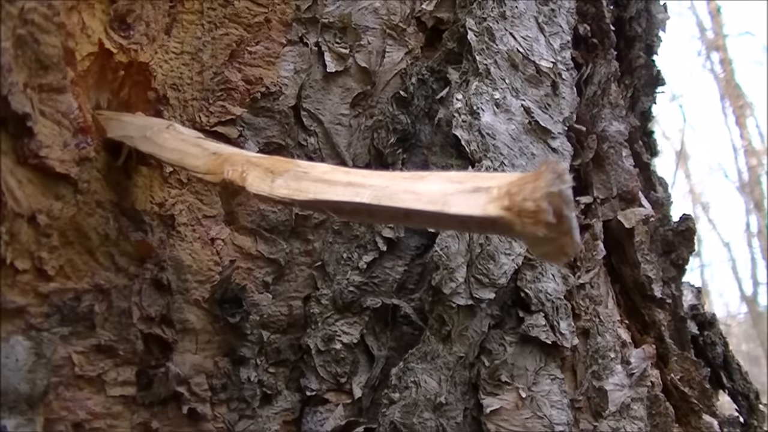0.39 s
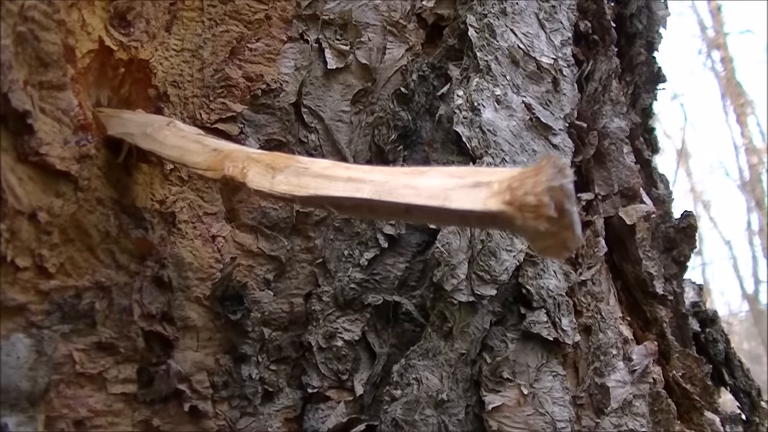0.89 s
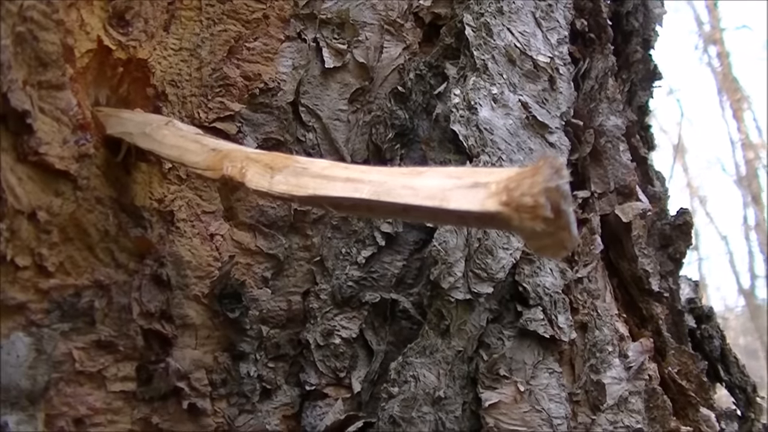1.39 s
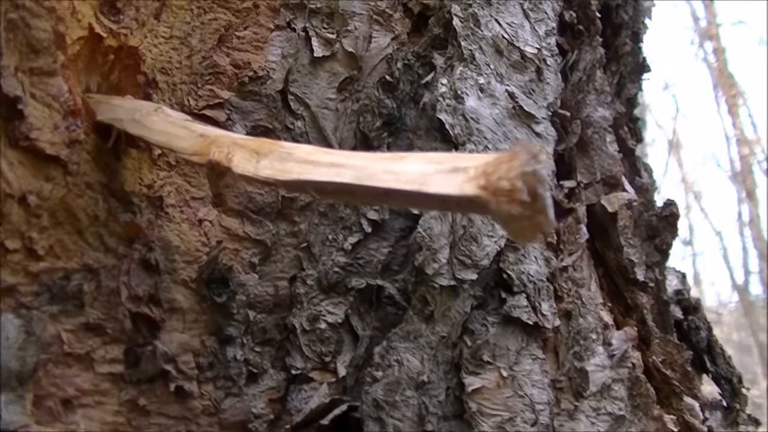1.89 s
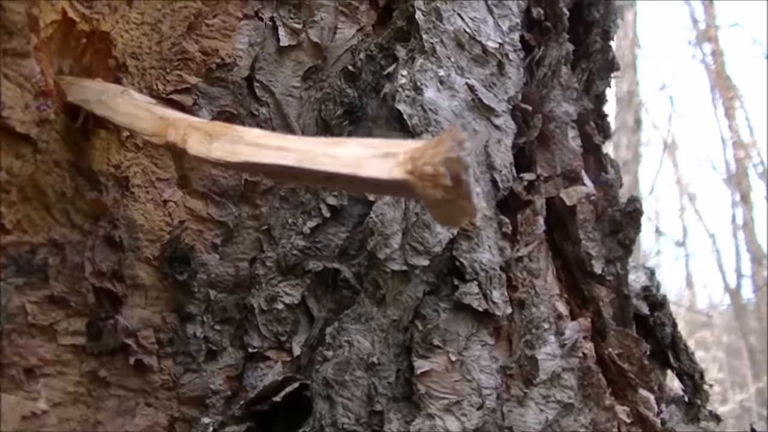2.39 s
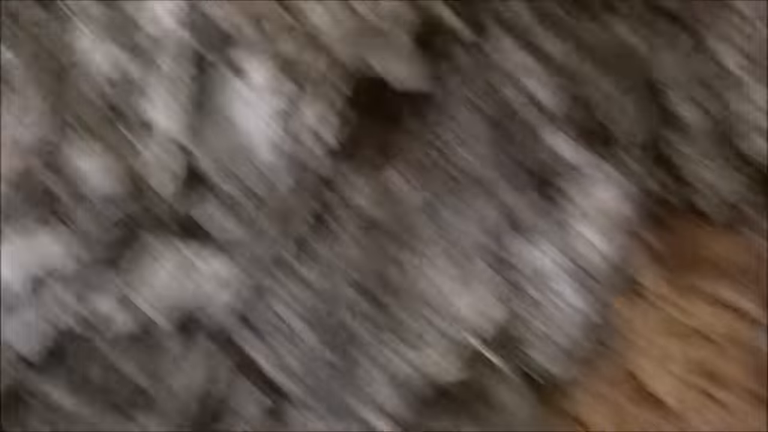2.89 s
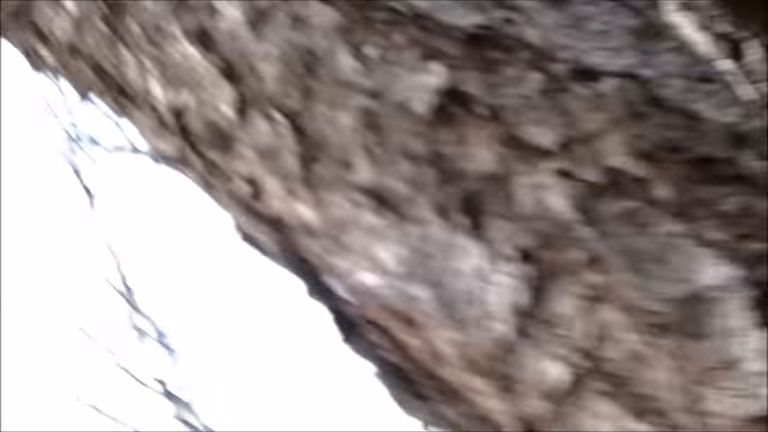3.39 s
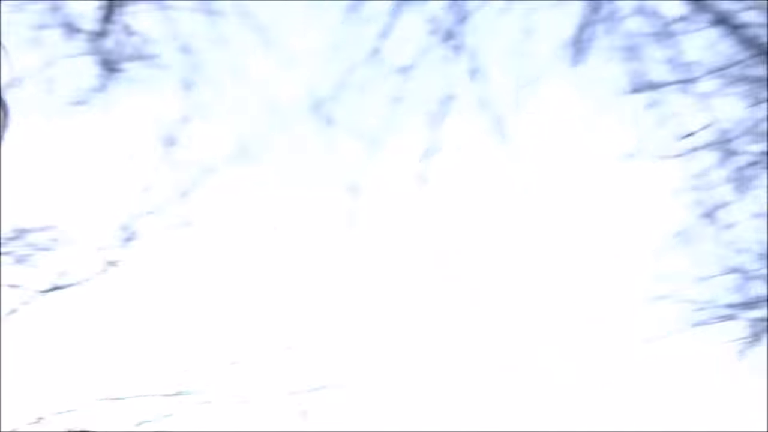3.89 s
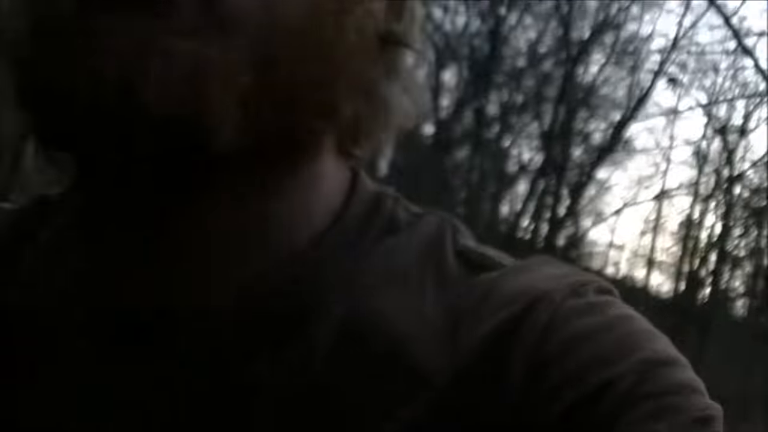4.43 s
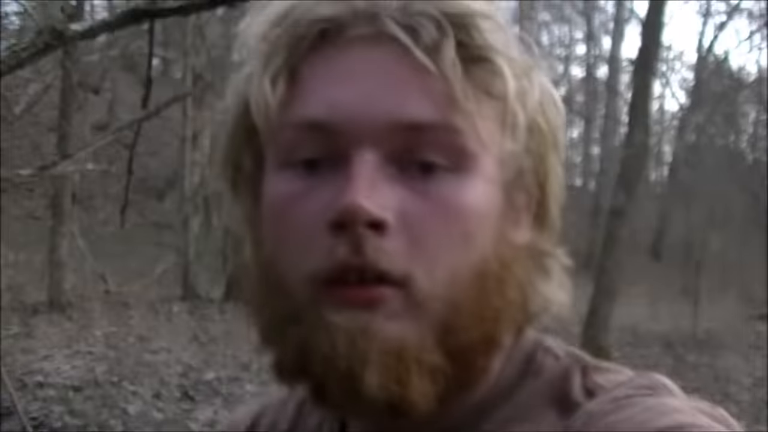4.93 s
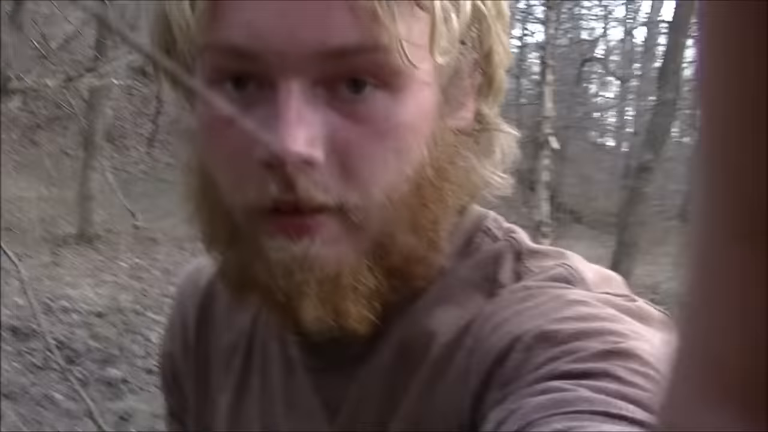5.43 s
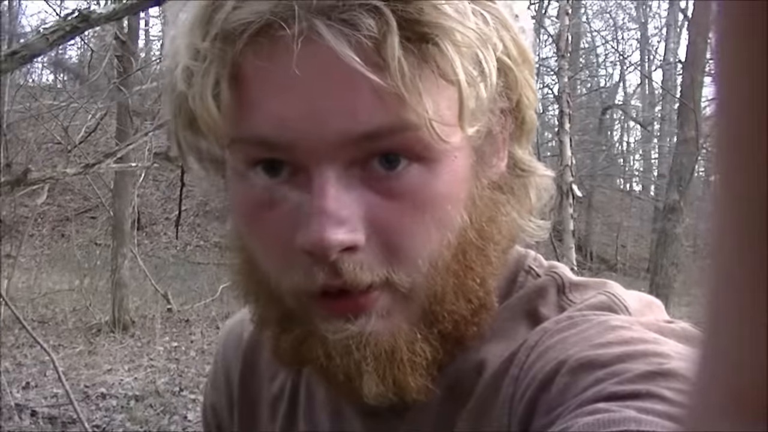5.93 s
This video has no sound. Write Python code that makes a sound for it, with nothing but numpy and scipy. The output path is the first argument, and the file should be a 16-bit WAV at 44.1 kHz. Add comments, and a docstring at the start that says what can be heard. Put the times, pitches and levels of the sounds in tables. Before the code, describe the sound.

A distant pond of tiny frogs peeps continuously in a high, shimmering chorus over faint rumble and hiss. Sparse dry leaf snaps come first. Then the handheld camera swings round: ticks and dull knocks on its body, rubbing, loud crackling leaves and soft puffs of air. The handling thins out, leaving the chorus stronger and slightly to the right, with a few nearer peeps.

```python
"""A pond of tiny tree frogs peeps across a bare spring wood over far rumble and hiss: gliding sines, shaped noise.
A few leaf snaps and one faint body knock come first: short noise bursts, each struck by a single impulse.
Then a hand-held camera is swung round. Feet crackle in dry leaves, a hand rubs and knocks the body,
ticks ring and air puffs on the ports: noise broken into clicks and clumps, bursts and low shaped noise.
The chorus swells and drifts right as the microphones turn toward the pond."""
import sys
import numpy as np
from scipy import signal
from scipy.fft import rfft, irfft, next_fast_len
from scipy.io import wavfile
from scipy.ndimage import map_coordinates

SR = 44100
rng = np.random.default_rng(int(sys.argv[2]) if len(sys.argv) > 2 else 0)


def log_audio(samples):
    """Write samples as a 16-bit WAV file to the path given in sys.argv[1]."""
    # one column per channel
    frames = np.atleast_2d(samples).T
    # limit to full scale, then quantise
    limited = np.clip(frames, -1, 1)
    pcm = np.round(limited * 32767).astype(np.int16)
    wavfile.write(sys.argv[1], SR, pcm)


def volts(x):
    """Linear amplitude factor 10**(x/20) for a level x in dB, scalar or array-like."""
    e = np.asarray(x, float) / 20
    return 10 ** e


N = 266754  # length in samples


def unit(x):
    """Scale to rms 1."""
    return x / np.sqrt(np.mean(x ** 2) + 1e-20)


def along(points, hz):
    """Read (Hz, value) points on a log frequency axis."""
    f, v = np.transpose(points)
    return np.interp(np.log(hz + 1), np.log(f + 1), v)


def curves(rows, before):
    """One value per sample for each column after the time; `before` holds until the first row."""
    s, *columns = np.transpose(rows)
    return [np.interp(np.arange(N) / SR, s, column, left=before) for column in columns]


def wobble(rate):
    """A smooth random curve, rate knots a second."""
    knots = rng.standard_normal(int(N * rate / SR) + 4)
    return map_coordinates(knots, [np.arange(N) * rate / SR])


def noise_pair():
    """Two unrelated white noises."""
    return rng.standard_normal((2, N))


def filtered(x, response):
    """x times a response of frequency, real or complex."""
    m = next_fast_len(x.shape[-1] + 4096)
    spectrum = rfft(x, m) * response(np.fft.rfftfreq(m, 1 / SR))
    return irfft(spectrum, m)[..., :x.shape[-1]]


def spread(pair, spectrum, alike):
    """Two unrelated noises coloured and mixed to a left-right likeness, rms 1."""
    def mid_side_response(hz):
        angle = np.arccos(np.clip(along(alike, hz), -1, 1)) / 2
        return volts(along(spectrum, hz)) * [np.cos(angle), np.sin(angle)]

    mid, side = filtered(pair, mid_side_response)
    return unit(np.array([mid + side, mid - side]))


def sides(db):
    """Left and right gains for a left-right difference in dB, positive to the left."""
    return volts(np.array([db, -np.asarray(db)]) / 2)


def add(track, s, sound):
    """Mix a stereo sound in at time s."""
    part = track[:, max(round(s * SR), 0):][:, :sound.shape[1]]
    part += sound[:, :part.shape[1]]


# partials of a peep: multiple of the sung note, level/dB
PEEP_PARTIALS = [(.5, -36), (1, -3), (1.5, -41)]


def peep(hz, length, rise, phase):
    """A whistled note gliding up by rise Hz/s, loudest a little before its middle."""
    u = np.arange(round(length * SR)) / (length * SR)
    turns = np.cumsum(hz + rise * length * (u - .5)) / SR
    shape = np.sin(np.pi * u ** 0.77) ** 0.79
    partials = [volts(db) * np.sin(2 * np.pi * k * (turns + phase)) for k, db in PEEP_PARTIALS]
    return np.sqrt(2) * shape * sum(partials)


def trunks(x, t60):
    """Scattering among the trees: a short noisy tail, partly different at each ear."""
    t = np.arange(SR // 2) / SR
    shared, left, right = rng.standard_normal((3, len(t))) * volts(-60 * t / t60)
    tail = np.array([shared + 0.9 * left, shared + 0.63 * right])
    return signal.fftconvolve(x, tail / np.linalg.norm(tail[0]), axes=1)[:, :x.shape[1]]


# the far chorus as the microphones turn: t/s, level/dB, left-right difference/dB
CHORUS_TURN = [(0, -41, -.5), (1.4, -40, -0.5), (1.92, -41.5, -1), (2.6, -40, -.5), (2.9, -38, -0.5),
               (3.07, -36, 1), (3.5, -38.5, -1), (4.25, -36.5, -4), (4.78, -35, -3), (5.2, -35, -2.5),
               (5.7, -35, -2.5), (6.05, -34, -2)]
# a broad, toneless murmur from the pond, either side of the peeps: f/Hz, relative level/dB
POND_MURMUR = [(900, -10.5), (1300, -3), (1500, 2.5), (1900, -4.5), (2300, -5.5), (3500, -6.5),
               (3900, -12.5), (4300, -3.5), (4700, -9), (5300, -21.5)]
# stereo image of the murmur and of everything near: f/Hz, left-right likeness (-1 to 1)
NEAR_LIKENESS = [(60, 0.39), (130, 0.81), (290, 0.81), (640, 0.94), (3100, 0.83), (6800, 0.35),
                 (15000, -0.21)]


def far_chorus(groups=10, count=36):
    """Frogs keep their own pitch, place and pace, about a peep a second; each bank of the pond has its own echoes."""
    level_db, pan_db = curves(CHORUS_TURN, None)
    far = np.zeros((2, N + SR))  # one second of run-in
    for bank in rng.standard_normal((groups, count, 5)):
        calls = np.zeros((2, N + SR))
        for pitch, size, place, pace, glide in bank:
            gaps = .95 + .12 * pace + .06 * rng.standard_normal(9)
            times = rng.random() + np.cumsum(gaps) - 1
            note = peep(2900 + 150 * pitch, .11 + 0.01242 * glide, 2300 + 400 * pace, rng.random())
            # frogs far from the common pitch are the weaker ones
            call = volts(2 * size - 1.2 * pitch ** 2) * sides([3 * place]) * note
            for s in times[times < N / SR + 1]:
                add(calls, s, call)
        far += calls + volts(0.4) * trunks(calls, t60=1.0)
    far = unit(far[:, SR:]) * (1 + 0.19 * wobble(700))  # moving air makes far calls flutter
    far = far + volts(-21) * spread(noise_pair(), POND_MURMUR, NEAR_LIKENESS)
    return volts(level_db) * sides(pan_db) * far


# far rumble and hiss: f/Hz, relative level/dB
AIR_SPECTRUM = [(15, -57), (25, -25.5), (100, -13), (160, -12.5), (330, -18), (700, -24), (1300, -28),
                (2100, -32), (3700, -34), (5400, -37.5), (11000, -44), (16000, -56)]
# their stereo image: f/Hz, left-right likeness (-1 to 1)
AIR_LIKENESS = [(60, 0.49), (130, 0.59), (290, -0.031), (640, -0.59), (1400, -0.74), (6800, 0.0065),
                (15000, 0.41)]


def air():
    """Far rumble and the hiss of the wood and microphones: shaped noise, its level wavering slightly."""
    level_db = -53.5 + 0.51 * wobble(3.3)
    return volts(level_db) * spread(noise_pair(), AIR_SPECTRUM, AIR_LIKENESS)


def bursts(table, width, unlike, blow, lead_db, tail_db, lag_s, colour):
    """Each event creaks briefly, gives one blow and a noise burst round its centre pitch, then a weaker after-crackle."""
    lead = SR // 50  # samples of creak before the blow
    track, t = np.zeros((2, N)), np.arange(-lead, SR // 16) / SR
    for s, db, hz, t60_ms, pan in table:
        shared, left, right = rng.standard_normal((3, len(t)))
        main_fade = volts(-60 * t / (t60_ms / 1000))
        after_crackle = volts(tail_db - 60 * t / (t60_ms / 250))  # four times as long
        creak = volts(lead_db + 60 * t / 0.026)
        fade = np.where(t < 0, creak, main_fade + after_crackle)
        burst = fade * (shared + unlike * np.array([left, right]))
        burst[:, lead] -= blow
        # off-centre events reach one port first
        lag = lag_s * rng.standard_normal() * np.array([[.5], [-.5]])

        def response(f):
            spread_hz = width * hz  # width is band width over centre pitch
            band = (1j * f * spread_hz / (hz * hz - f * f + 1j * f * spread_hz)) ** 2
            return band * colour(f) * np.exp(-2j * np.pi * f * lag)

        sound = filtered(burst, response)
        peak = np.abs(sound).max(1).mean()
        add(track, s - lead / SR, volts(db) * sides([pan]) * sound / peak)
    return track


def snap_bursts(rows):
    """Leaves and twigs snap as wide, bright bursts; thin leaves give no bass."""
    leaf = lambda f: 1 / (1 + 1j * f / 10000) / (1 - 1j * 2600 / (f + 1))
    return bursts(rows, 2.7, unlike=.6, blow=1.5, lead_db=-20, tail_db=-18, lag_s=4e-5, colour=leaf)


# leaf and twig snaps: t/s, peak level/dB, centre f/Hz, t60/ms, left-right difference/dB
LEAF_SNAPS = [(.3042, -43, 7300, 7.8, 3), (.4511, -19, 7460, 4.4, 2), (.5318, -25, 8500, 5.5, 4),
              (.5434, -38, 9600, 6, -3), (.7942, -40.5, 6100, 12, -2), (1.5925, -34, 5600, 4.5, -3),
              (1.6675, -41, 4900, 6, 4), (1.7283, -37.5, 6300, 6.8, 1), (1.8928, -32.5, 6400, 6.1, 1),
              (1.9263, -26.5, 7540, 8, 2), (1.9613, -33, 5000, 8.2, 3), (2.3901, -31, 9500, 11, -1),
              (2.421, -38, 7600, 13, 2), (2.8431, -38, 7450, 17, -2), (2.9175, -35, 7900, 10, 3),
              (3.1135, -32, 7600, 7, -1), (3.2591, -26.5, 6700, 24, 0), (3.4056, -28, 6700, 50, 0),
              (3.4459, -20, 6100, 5, -2), (3.4649, -20, 7400, 24, -1), (3.4812, -4, 7340, 9.6, -.5),
              (3.5442, -21, 7000, 5.4, -2), (3.5714, -16, 6700, 11, -6), (3.5994, -14, 9900, 10, -5),
              (3.6312, -10.5, 6600, 6.4, 1), (3.6769, -1, 6600, 5, 1), (3.6926, -13.5, 6500, 7.4, -4),
              (3.798, -16, 8000, 19, 1), (3.8593, -15, 5700, 5.3, 3), (4.0281, -7.5, 6100, 19, 0),
              (4.0729, -5.5, 7560, 28, 0), (4.0909, -10, 8800, 42, -1), (4.4834, -15, 5500, 12, -1),
              (4.497, -11, 6850, 64, 0), (4.5378, -10, 5760, 17, -3), (4.5446, -8.5, 8100, 12, 2),
              (4.5522, -16, 8040, 4.3, 0), (4.6111, -16, 7000, 6, 0), (4.6198, -6.5, 5730, 10, -2),
              (4.6472, -17, 9200, 8.2, 11), (4.6899, -17.5, 5970, 26, -2), (4.7089, -16.5, 6500, 9, 0),
              (4.9613, -24, 10000, 8.9, -21), (4.9742, -22, 8900, 7.9, 15), (5.1533, -18, 6800, 6, -1),
              (5.2703, -26, 6060, 11.6, -3), (5.3449, -12, 7500, 24, -2), (5.362, -10, 6600, 5, -2),
              (5.4296, -19.5, 6800, 2.5, -3), (5.4593, -26.5, 8600, 5.1, -4), (5.5038, -9, 5100, 6.1, -5),
              (5.5122, -23.5, 7300, 3.7, -7), (5.5795, -29, 5140, 17, -6), (5.5946, -24.5, 5630, 4.2, -3),
              (5.8237, -21.5, 5900, 6.4, -1)]


def snaps():
    """The snaps that stand out: leaves and twigs breaking."""
    return snap_bursts(LEAF_SNAPS)


# camera body resonances: f/Hz, width/Hz, relative level/dB
BODY_MODES = [(166, 230, 12), (313, 55, -5), (460, 94, 1.5), (690, 1200, -52.5), (960, 110, -9.5),
              (1190, 27, -12.5), (1420, 1400, 0), (2220, 190, 7)]


def resonances(f):
    """Causal response of the camera body: a sum of damped modes."""
    return sum(volts(db) * 1j * f * w / (c * c - f * f + 1j * f * w) for c, w, db in BODY_MODES)


# knocks on the camera body: t/s, peak level/dB, centre f/Hz, t60/ms, left-right difference/dB
BODY_KNOCKS = [(.4504, -35, 1360, 11, 3), (2.7691, -33.5, 550, 21, -10), (2.9988, -19, 580, 25, -1.5),
               (3.1237, -29.5, 1100, 110, -7), (3.1674, -23.5, 1040, 37, -3), (3.28, -17.5, 520, 23, -3.5),
               (3.481, -12.5, 1560, 16, 0), (3.6766, -17, 1270, 20, -1), (3.8034, -17.5, 1160, 124, 0),
               (4.014, -11.5, 960, 31, -7), (4.028, -10.5, 930, 17, -2), (4.0673, -15, 680, 37, 0),
               (4.312, -28.5, 400, 17, -2), (4.4276, -17, 1500, 16, 0), (4.485, -25.5, 600, 20, -2),
               (4.5013, -19, 1160, 35, 0), (4.9124, -24, 1400, 4.4, -1), (4.949, -22.5, 1285, 6.9, -1),
               (4.985, -33.5, 380, 28, -6), (5.088, -28, 960, 66, -6), (5.1717, -17.5, 490, 39, -2.5),
               (5.1725, -30.5, 120, 52, -2), (5.2099, -24.5, 440, 23, -2), (5.2783, -28.5, 460, 27, -1),
               (5.3447, -20, 1740, 59, -1), (5.361, -30, 1510, 48, 3), (5.5001, -30.5, 480, 22, 1),
               (5.7967, -33, 460, 59, -2), (5.8227, -33, 1200, 22, -1), (5.905, -40.5, 400, 27, -2)]


def knocks():
    """Hard blows on the camera body, heard directly and through its resonances."""
    shell = lambda f: 1.44 + resonances(f)
    return bursts(BODY_KNOCKS, 1.57, unlike=.55, blow=14, lead_db=-10, tail_db=-16, lag_s=6e-5, colour=shell)


# nearer peeps that stand out: middle t/s, middle f/Hz, level/dB, left-right difference/dB
NEAR_PEEPS = [(0.591, 3027, -43, 2), (1.552, 2945, -39.5, 0), (1.904, 2734, -39, 2), (2.44, 2926, -43.5, 2),
              (3.081, 2710, -40, 11), (3.087, 2950, -32.5, 4), (3.64, 2820, -39, -7), (3.73, 3070, -33, 2),
              (4.445, 3050, -33, 0), (4.899, 2740, -33, -14), (5.29, 2994, -35, -2),
              (5.45, 2794, -35.5, -8), (5.654, 2633, -38, -7), (5.869, 2776, -30, -6)]


def near_peeps():
    """Nearer frogs whistle singly, each with a shorter echo among the trunks."""
    near = np.zeros((2, N))
    length_s, rise_hz_per_s = .093, 2050
    for s, hz, db, pan in NEAR_PEEPS:
        note = volts(db) * sides([pan]) * peep(hz, length_s, rise_hz_per_s, rng.random())
        note = np.pad(note, [(0, 0), (0, SR // 4)])  # room for the echo
        add(near, s - length_s / 2, note + volts(-2.5) * trunks(note, t60=0.48))
    return near


def crackle(clump_db):
    """Dense tiny clicks of random size, each lasting a moment, gathered into clumps."""
    clicks_per_s = 500
    size = volts(3.8 * rng.exponential(size=N)) * (rng.random(N) < clicks_per_s / SR)
    t = np.arange(300) / SR
    ring = volts(-60 * t / 0.034) * (1 - np.exp(-t / .0004))
    clicks = unit(np.convolve(np.minimum(size, 14), ring)[:N])
    return (clicks * .7 + 1) * volts(clump_db)


def grains(level_db, count=6000):
    """Single leaf cells crack: tiny damped rings, each with its own pitch, size and side."""
    when, pitch, size, place = rng.random((4, count))
    hz, t = 2500 * 4 ** pitch[:, None], np.arange(160) / SR
    heights = np.minimum(volts(-5 * np.log(size)), 7)[:, None]  # mostly small, a few large
    ring = np.sin(2 * np.pi * hz * t) * np.exp(-t * hz / 3.5) * heights
    at = (when * (N - len(t))).astype(int)[:, None] + np.arange(len(t))
    gains = sides(12 * (place - .5))
    pair = [np.bincount(at.ravel(), (gain[:, None] * ring).ravel(), N) for gain in gains]
    return volts(level_db) * unit(np.array(pair))


# colour of the leaf crunch: f/Hz, relative level/dB
CRUNCH_SPECTRUM = [(800, -28), (2000, -5.5), (3500, -8), (6000, -7.5), (9000, -16.5), (14000, -59)]
# colour of the top-treble fizz: f/Hz, relative level/dB
FIZZ_SPECTRUM = [(6000, -25), (9000, 0.5), (12000, 1.5), (15000, -8), (17000, -34)]


def leaf_litter(leaf_db, clump_db):
    """Dry leaves break underfoot: crackling noise, a treble fizz that swings wider in level, and single grains."""
    meets_db, growth = -25, 1.24  # fizz equals crunch at meets_db; dB of fizz per dB of crunch
    fizz_db = meets_db + growth * (leaf_db - meets_db)
    clicks = crackle(clump_db)
    crunch = spread(volts(0.47 * wobble(45)) * clicks * noise_pair(), CRUNCH_SPECTRUM, NEAR_LIKENESS)
    fizz = spread(volts(0.45 * wobble(50)) * clicks * noise_pair(), FIZZ_SPECTRUM, NEAR_LIKENESS)
    return volts(leaf_db) * crunch + volts(fizz_db) * fizz + grains(leaf_db - 5.0)


# colour of the rubbing: f/Hz, relative level/dB
RUB_SPECTRUM = [(40, -14), (100, -9.5), (250, -7.5), (500, -4), (1100, -3), (2200, -3), (4000, -9.5),
                (8000, -19.5)]


def body_rub(rub_db, clump_db):
    """Cloth and hand rub the body: uneven noise with a little of the body's resonance."""
    rub = volts(.6 * clump_db + 2.2 * wobble(40)) * noise_pair()
    rub = filtered(rub, lambda hz: 1 + 0.097 * resonances(hz))
    return volts(rub_db) * spread(rub, RUB_SPECTRUM, NEAR_LIKENESS)


# movement: t/s, leaf crunch level/dB, rub on the camera level/dB
MOVEMENT = [(1.85, -69, -63), (1.95, -64, -51.5), (2.07, -59, -63), (2.42, -67.5, -62.5),
            (2.65, -48.5, -50), (2.78, -57, -53.5), (3.02, -58, -62), (3.15, -60, -51.5),
            (3.27, -54.5, -52), (3.65, -38, -33.5), (3.75, -40.5, -38), (3.85, -38.5, -37.5),
            (3.95, -41, -38), (4.07, -33, -32), (4.25, -37.5, -37.5), (4.42, -32.5, -38),
            (4.55, -40.5, -37), (4.65, -39.5, -40.5), (4.82, -46, -48), (4.95, -40, -43),
            (5.07, -40.5, -44.5), (5.2, -46, -43), (5.35, -48, -48.5), (5.5, -59, -56.5),
            (5.65, -52.5, -56), (5.85, -59.5, -55), (6.05, -59, -59)]


def movement():
    """Feet shift in leaves while the body is rubbed; both share the same clumps."""
    leaf_db, rub_db = curves(MOVEMENT, -120)
    clump_db = 1.2 * wobble(25) + 1.9 * wobble(110)
    return leaf_litter(leaf_db, clump_db) + body_rub(rub_db, clump_db)


def lesser_snaps(count=110):
    """Small snaps at random moments, their peaks following the leaf crunch."""
    when, size, pitch, place = rng.random((count, 4)).T
    s, leaf_db, _ = np.transpose(MOVEMENT)
    at = s[0] + when * (s[-1] - s[0])
    peak_db = np.interp(at, s, leaf_db) + 15.5 + 3 * (size - .5)
    centre_hz, t60_ms, pan_db = 4800 * 2 ** pitch, 7.3 * (.5 + size), 17 * (place - .5)
    return snap_bursts(np.transpose([at, peak_db, centre_hz, t60_ms, pan_db]).tolist())


# narrow ringing ticks: t/s, peak level/dB, centre f/Hz, t60/ms, left-right difference/dB
RINGING_TICKS = [(1.9051, -34.5, 1330, 18, 3), (2.5018, -36.5, 1090, 27, -1), (2.5029, -24.5, 5200, 10, 0),
                 (2.5865, -36.5, 1150, 91, -6), (2.5877, -20.5, 5000, 13, -3),
                 (2.6449, -27.5, 4380, 5.9, 9), (2.646, -32, 1040, 33, -7), (2.995, -23.5, 1170, 47, -4),
                 (2.9854, -18.5, 4300, 8.6, 4), (2.9987, -20.5, 5700, 3, -2), (3.1244, -17.5, 6900, 5.5, 1),
                 (3.1625, -31, 6800, 23, -2), (3.1681, -24.5, 6400, 5, 0), (3.3407, -32, 4400, 10, 3),
                 (4.3264, -19.5, 1140, 17, 1), (4.6197, -21.5, 1770, 13, -2), (4.8304, -21, 5700, 3.5, -5),
                 (5.1966, -24.5, 4800, 3, 2), (5.2919, -21, 2100, 20, -2)]


def ticks():
    """Narrow ringing ticks, perhaps the casing flexing in the hand."""
    return bursts(RINGING_TICKS, 0.5, unlike=.55, blow=4, lead_db=-18, tail_db=-18, lag_s=4e-5,
                  colour=np.ones_like)


# puffs of air on the ports: middle t/s, level/dB
AIR_PUFFS = [(2.749, -62), (2.95, -62), (3.55, -54), (3.85, -52), (4.05, -49), (4.55, -66), (4.85, -56),
             (5.16, -43), (5.35, -54)]
# colour of the buffeting: f/Hz, relative level/dB
BUFFET_SPECTRUM = [(15, -30), (40, 8), (90, 9), (160, -0.5), (300, -21.5)]


def buffeting():
    """The swing buffets the ports: lumpy low noise in puffs that swell and fade as bell curves."""
    t, puff_s = np.arange(N) / SR, 0.055  # time from a puff's middle to 1/e
    gain = sum(volts(db) * np.exp(-((t - s) / puff_s) ** 2) for s, db in AIR_PUFFS)
    lumps = volts(3.1 * wobble(4.27)) * noise_pair()
    return gain * spread(lumps, BUFFET_SPECTRUM, [(50, .1)])  # nearly unrelated left and right


def scene():
    """Everything at the microphones."""
    wood = far_chorus() + air() + near_peeps()
    leaves_and_body = snaps() + knocks() + movement() + lesser_snaps()
    return wood + leaves_and_body + ticks() + buffeting()


def low_pass(x):
    """Removes everything above the highest recorded frequency."""
    return signal.sosfilt(signal.butter(12, 16650, fs=SR, output="sos"), x)


def record(dry):
    """The microphones fall off steeply in the top treble."""
    heard = filtered(dry, lambda hz: 1 / np.sqrt(1 + (hz / 15600) ** 40))
    return low_pass(heard)


dry = scene()
out = record(dry)
log_audio(out)
```